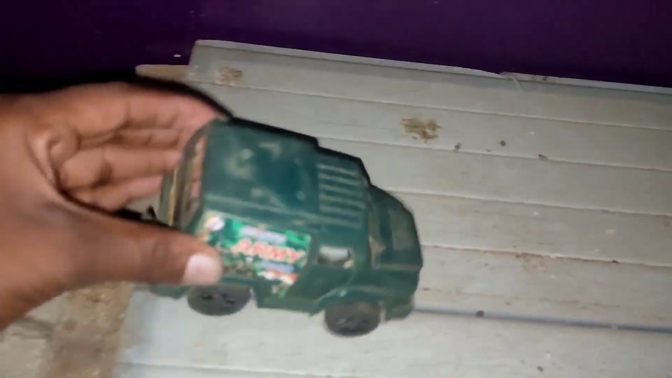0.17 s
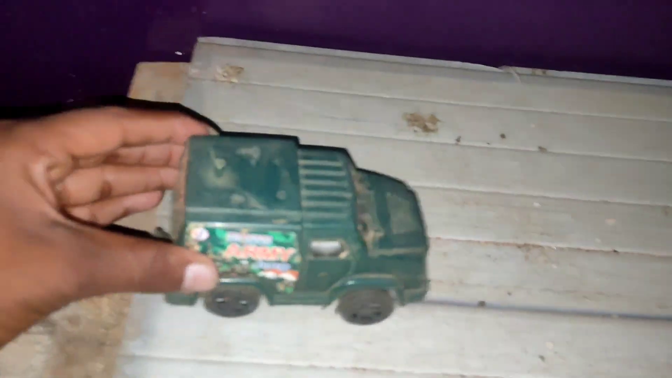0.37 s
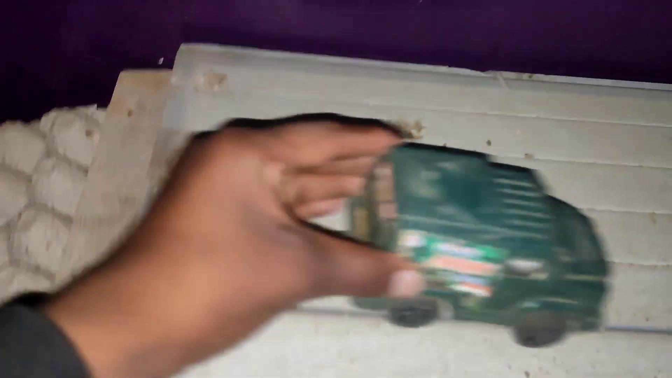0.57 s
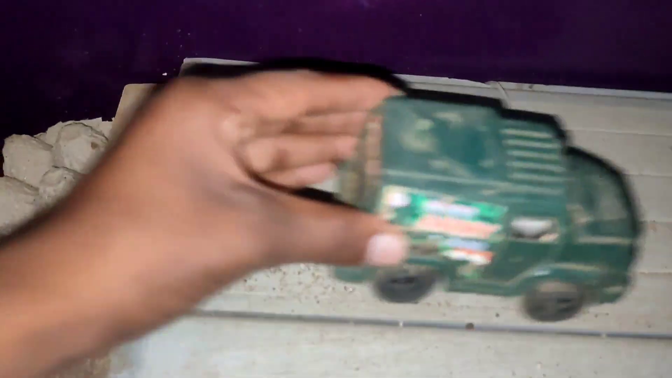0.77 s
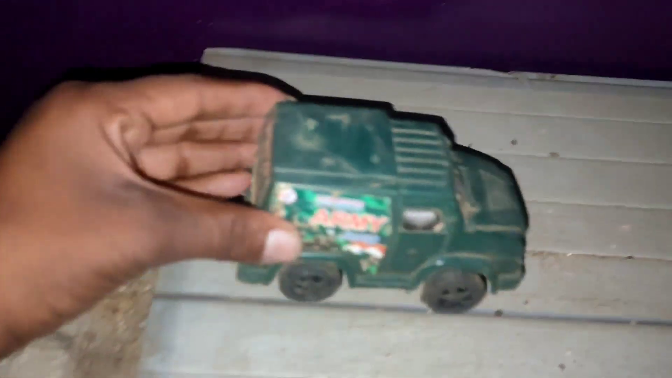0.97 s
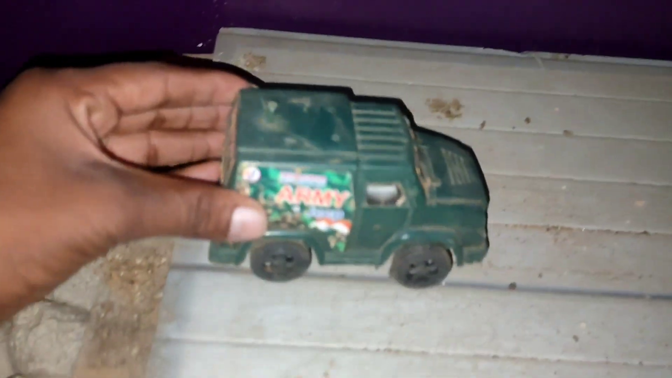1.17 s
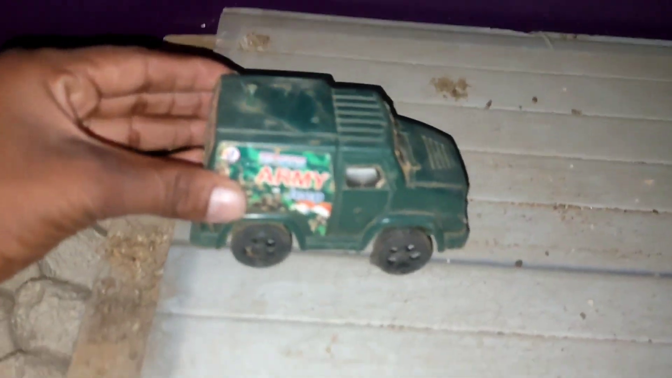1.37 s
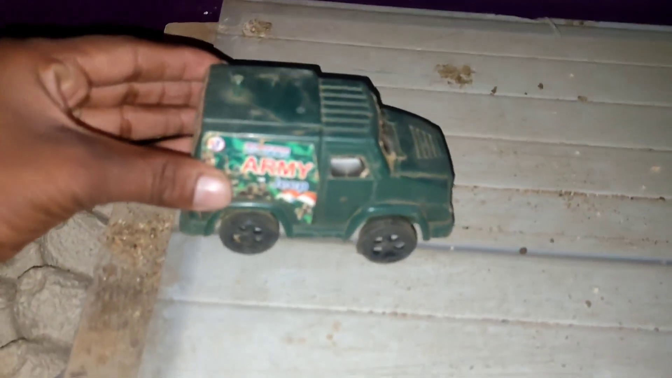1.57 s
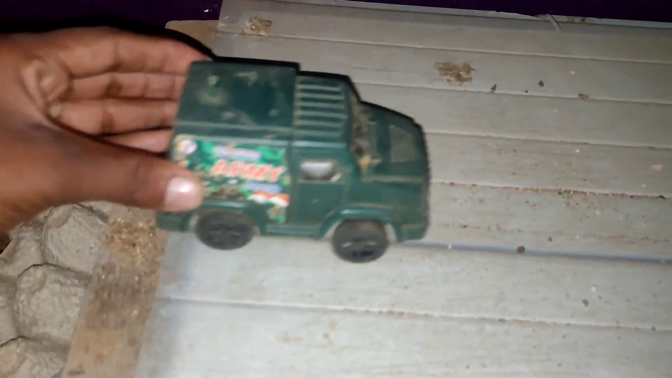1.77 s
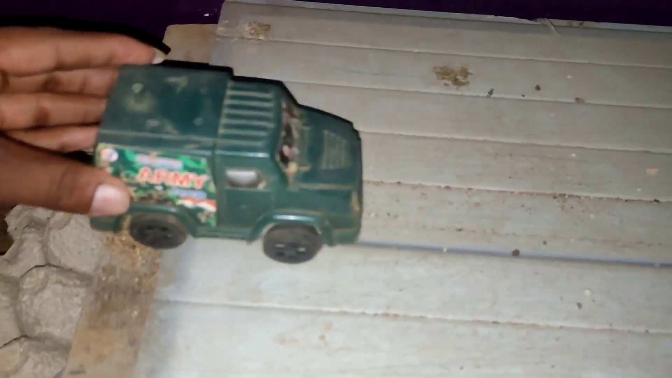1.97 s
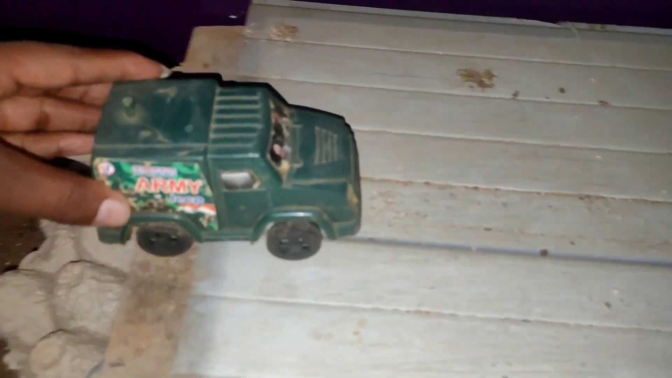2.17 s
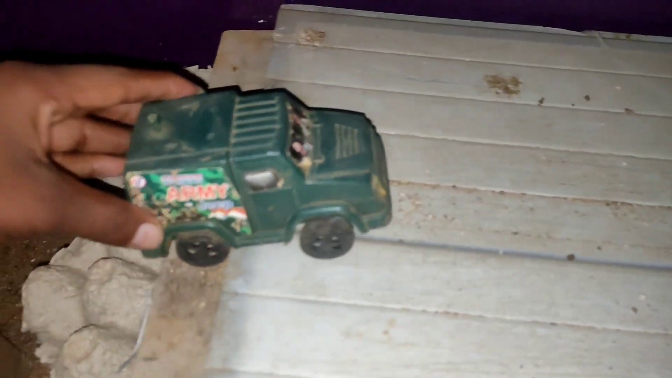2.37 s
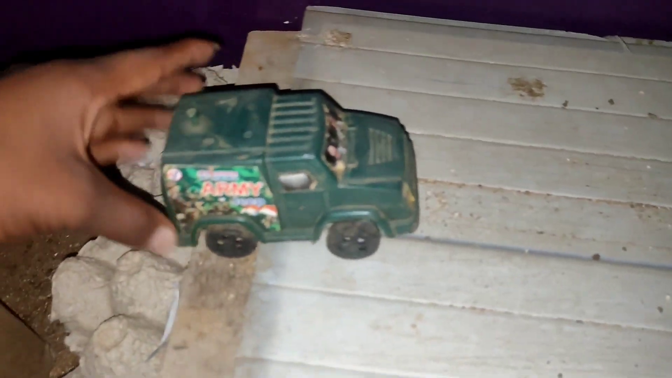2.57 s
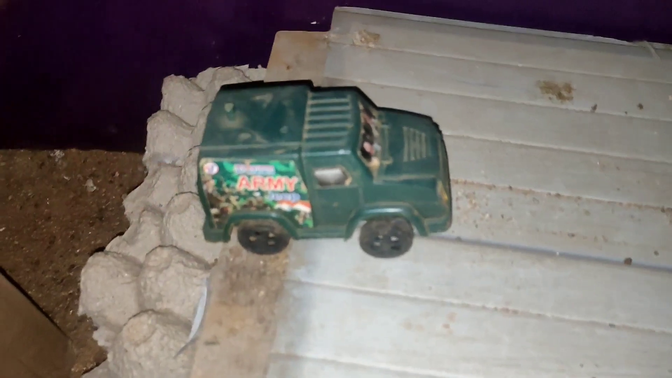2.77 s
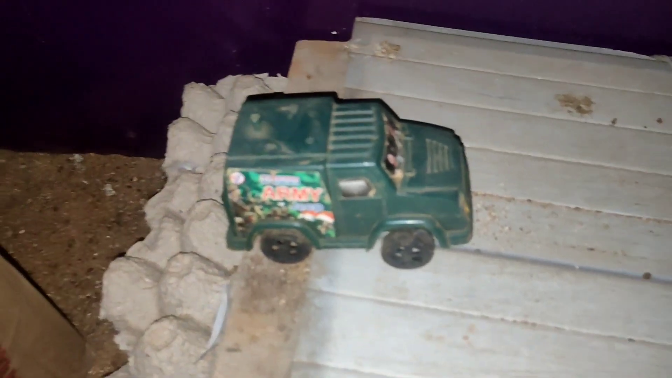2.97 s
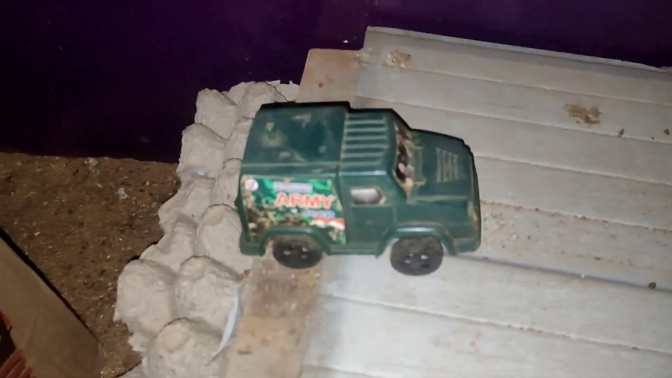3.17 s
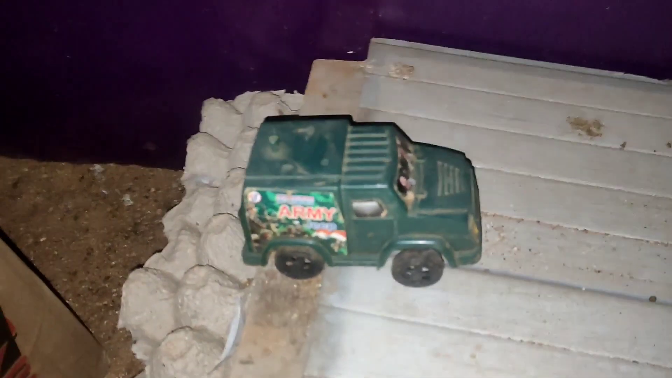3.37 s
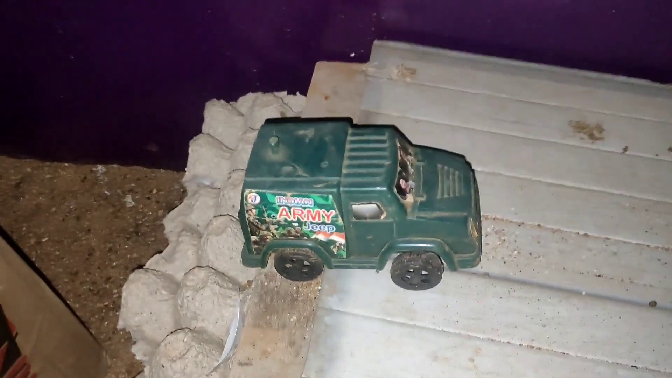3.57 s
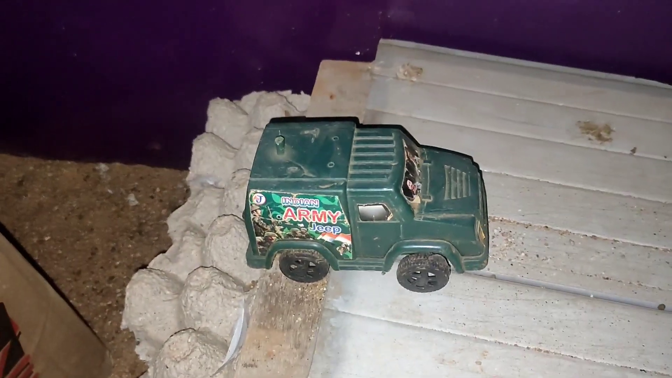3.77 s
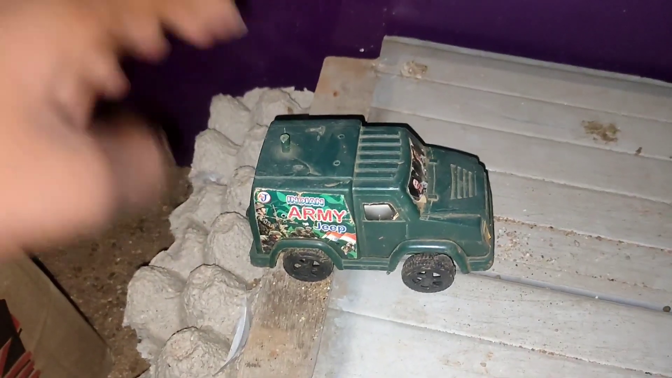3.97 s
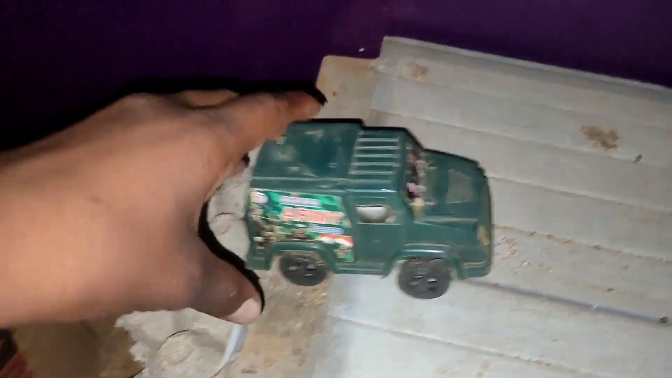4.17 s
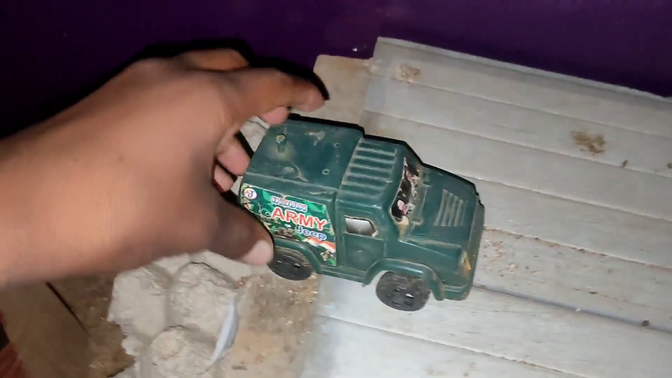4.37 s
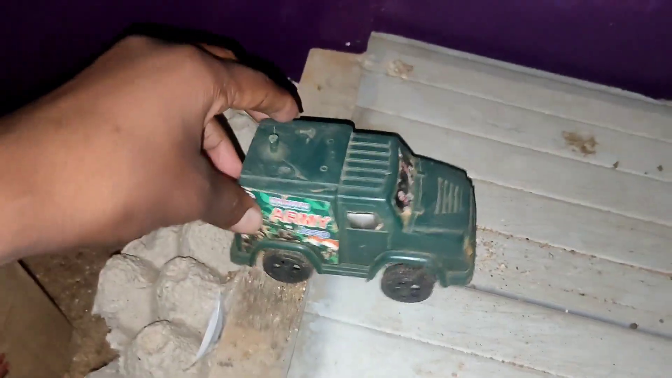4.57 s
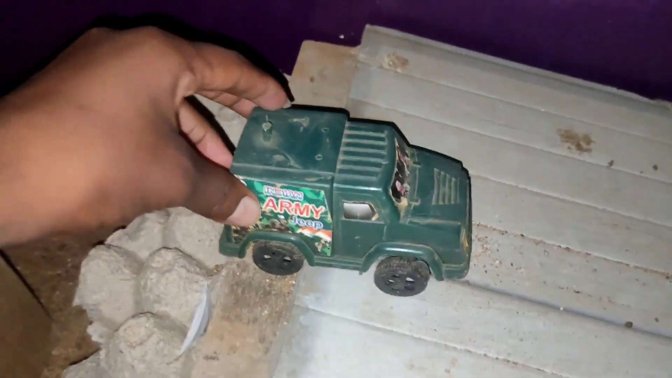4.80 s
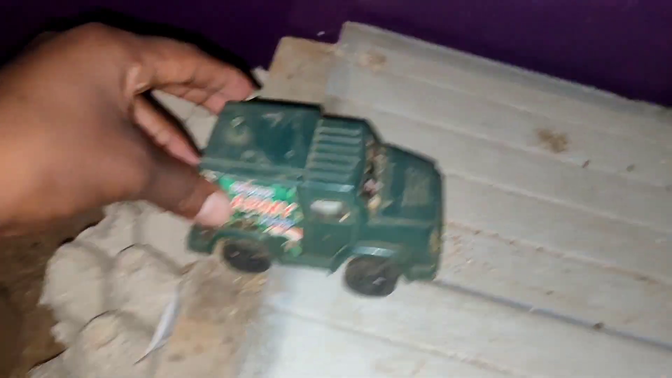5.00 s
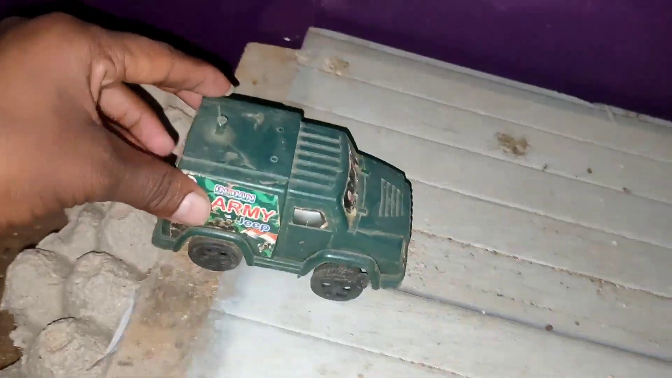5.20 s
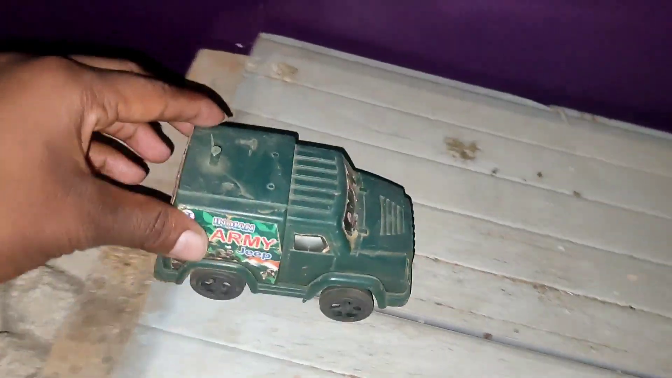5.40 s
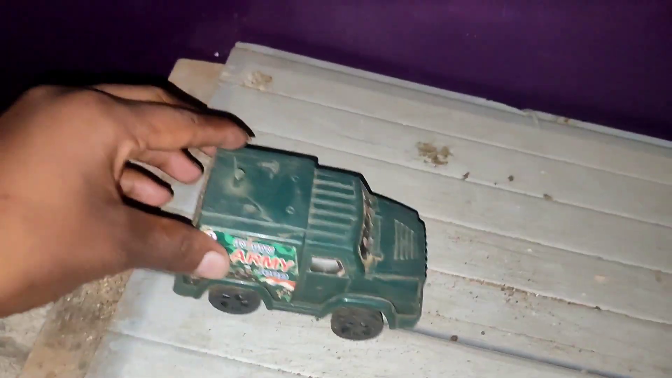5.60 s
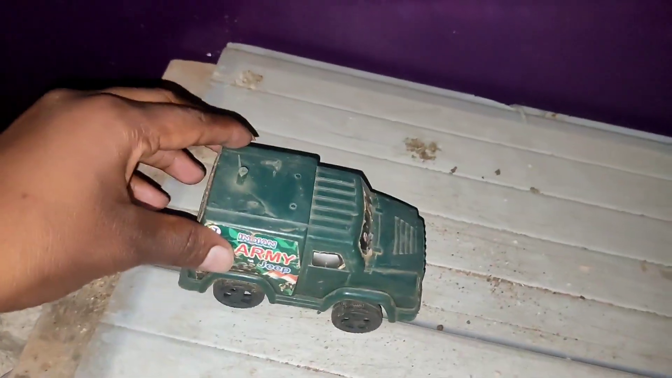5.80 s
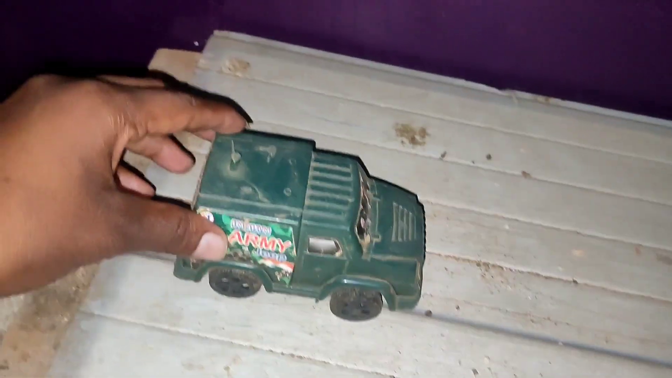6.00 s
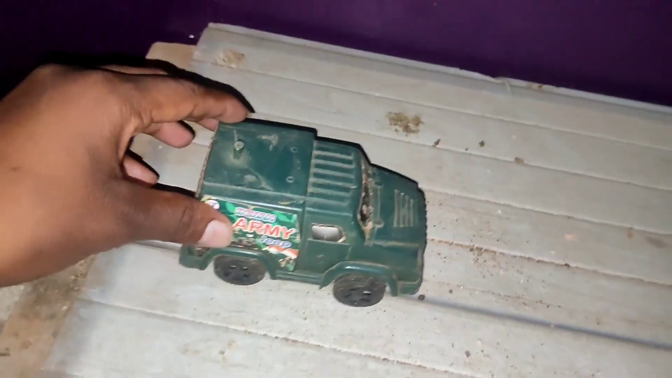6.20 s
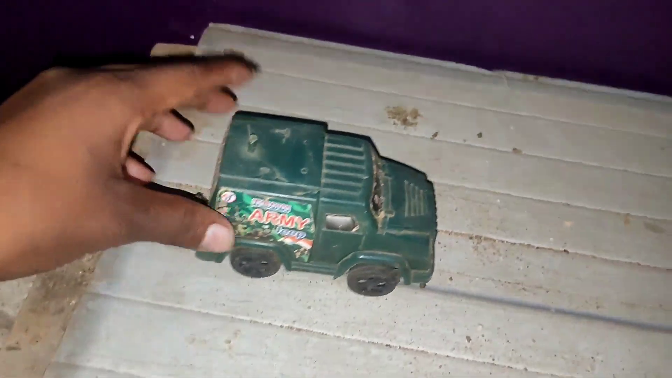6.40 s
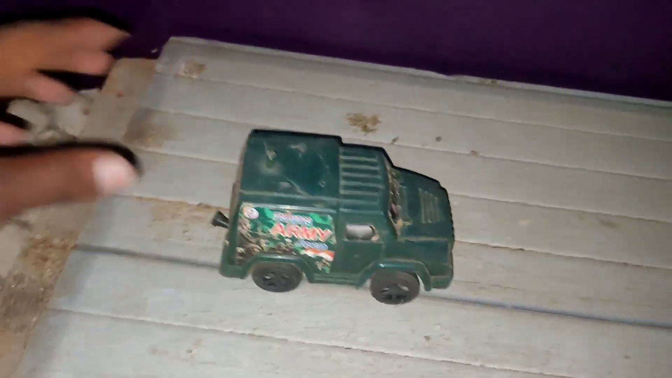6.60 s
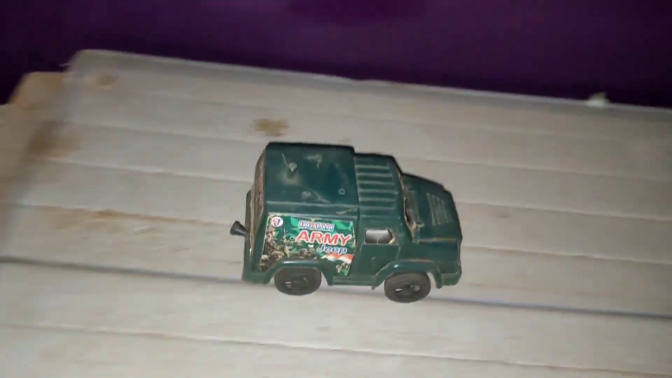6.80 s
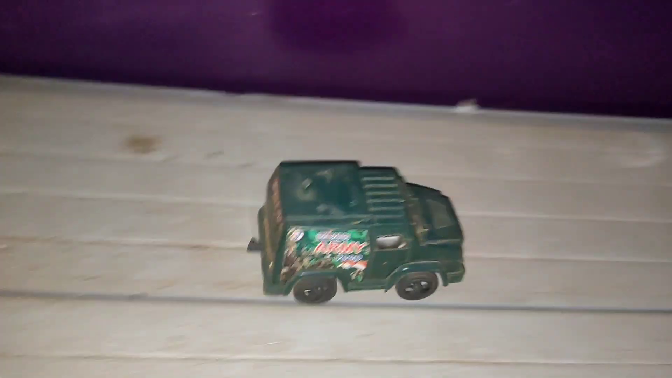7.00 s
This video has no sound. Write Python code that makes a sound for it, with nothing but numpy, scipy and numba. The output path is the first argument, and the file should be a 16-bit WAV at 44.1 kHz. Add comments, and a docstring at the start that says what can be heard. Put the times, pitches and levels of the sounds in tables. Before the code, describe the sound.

A small hollow plastic toy truck is pushed by hand over a wooden board indoors, its wheels rattling, knocking and briefly squeaking.

```python
"""Indoors, on a wooden board close to a phone, a hand pushes a small hollow plastic toy truck to and fro.
Tread and grit tap the shell and the board densely and make them ring; single knocks and snaps stand out.
Now and then an axle hisses and squeals, and once the wheels whirr. Skin and cloth rustle, rubs sing,
and the hand bumps and taps the phone. Low room hums and the board's lingering ring sound faintly."""
import sys
import numpy as np
from scipy import signal
from scipy.fft import rfft, irfft
from scipy.io import wavfile
from scipy.ndimage import uniform_filter1d
from numba import njit

SR = 44100
rng = np.random.default_rng(int(sys.argv[2]) if len(sys.argv) > 2 else 0)


def int16_out(signal):
    """Quantize to a 16-bit WAV file."""
    q = np.round(np.clip(np.atleast_2d(signal).T, -1, 1) * 32767)
    wavfile.write(sys.argv[1], SR, q.astype(np.int16))


N = 310905
TIME = np.arange(N) / SR
SIDES = np.array([[1], [-1]])  # plus on the left, minus on the right


def undb(db):
    """Turn decibels into a gain."""
    return np.exp(np.log(10) / 20 * np.asarray(db))

def level(x, db=0):
    """Set a signal's average (RMS) level."""
    return x * undb(db) / np.sqrt(np.mean(x ** 2))

def curve(rows, outside=-120.):
    """Join a table's points with straight lines, one value a sample."""
    times, *columns = np.transpose(rows)
    return [np.interp(TIME, times, c, left=outside, right=outside) for c in columns]

def band(x, lo_hz, hi_hz, order=2):
    """Keep the sound between two frequencies."""
    sos = signal.butter(order, [lo_hz, min(hi_hz, .45 * SR)], "bandpass", fs=SR, output="sos")
    return signal.sosfilt(sos, x)

def wobble(per_s):
    """A smooth random wander, roughly 1 either way."""
    hold = max(int(SR / per_s), 1)
    steps = np.repeat(rng.standard_normal(N // hold + 1), hold)
    return 1.3 * uniform_filter1d(uniform_filter1d(steps, hold), hold)[:N]

def strikes(times, db):
    """One clean, instant kick at each time."""
    x = np.zeros(N)
    x[(times * SR).astype(int)] = undb(db)
    return x

def bursts(times, db, fade_s):
    """One quickly fading puff of noise at each time."""
    x = np.zeros(N)
    fade = np.exp(-np.arange(int(.033 * SR)) / (fade_s * SR))
    puffs = rng.standard_normal((len(times), len(fade))) * fade
    for t, gain, puff in zip(times, undb(db), puffs):
        i = int(t * SR)
        x[i:i + len(puff)] += (gain * puff / np.sqrt(np.sum(puff ** 2)))[:N - i]
    return x

@njit
def resonate(x, hz, ring_s):
    """One ringing note whose pitch may move; it fades by 60 dB in ring_s."""
    turn = 2 * np.pi * hz / SR
    fade = np.exp(-np.log(1000) / (ring_s * SR))
    y, z = np.empty(len(x)), 0j
    for i in range(len(x)):
        z = z * fade * complex(np.cos(turn[i]), np.sin(turn[i])) + x[i] + 1e-18
        y[i] = z.imag
    return y

def ring(x, notes, ring_s, apart_db, drift=.04, share_db=2.5):
    """A struck part rings. Grip and contact point move, so each note's pitch and strength wander."""
    out = 0
    for k, (hz, db) in enumerate(notes):
        pitch = hz * (1 + drift * np.tanh(wobble(15)))
        share = undb(share_db * np.clip(wobble(40), -2, 1.5))
        note = resonate(x * share, pitch, ring_s)
        sign = (-1) ** (k // 2)
        out = out + sign * undb(db + apart_db * wobble(14) * SIDES) * note
    return out / np.sqrt(np.sum(undb(np.array(notes)[:, 1]) ** 2))

def tread_taps(per_s=900, spread_db=4., most_db=13.):
    """Tread and grit touch at chance moments: many small taps, a few large."""
    hits = (rng.random(N) < per_s / SR) * rng.choice([-1, 1], N)
    return level(hits * undb(np.minimum(spread_db * rng.exponential(size=N), most_db)))

# How loudly the truck rolls, one curve a push: t/s, level/dB
PUSHES = [
    [(0, -53), (.05, -69.5), (.12, -65), (.235, -78)],
    [(.24, -35.5), (.3, -47), (.35, -33.5), (.4, -49), (.48, -36), (.57, -21.5), (.63, -35.5), (.66, -38.5),
     (.73, -47.5), (.79, -52.5), (.9, -58.5), (1.0, -65.5), (1.2, -75), (1.54, -85)],
    [(1.545, -73.5), (1.56, -62), (1.75, -53), (1.9, -52.5), (2.03, -47.5), (2.12, -56), (2.17, -44.5),
     (2.23, -57), (2.37, -66.5)],
    [(2.378, -33), (2.385, -43.5), (2.45, -53.5), (2.51, -59), (2.54, -60), (2.64, -69), (2.86, -77),
     (3.1, -78.5), (3.4, -103)],
    [(4.27, -90), (4.287, -58), (4.335, -53.5), (4.41, -65), (4.435, -49), (4.47, -55.5)],
    [(4.475, -58), (4.575, -54.5), (4.6, -45.5), (4.67, -57.5), (4.72, -63), (4.78, -71.5), (4.92, -75),
     (4.95, -73)],
    [(4.96, -73.5), (5.1, -57.5), (5.27, -47.5), (5.36, -42.5), (5.47, -50), (5.51, -46), (5.56, -41),
     (5.63, -54.5), (5.7, -45.5), (5.8, -56.5)],
    [(5.81, -63), (5.87, -62.5), (5.94, -63), (5.97, -54), (6.06, -60), (6.13, -68.5), (6.24, -72.5),
     (6.3, -81)],
    [(6.31, -80.5), (6.44, -65), (6.49, -47.5), (6.53, -60), (6.63, -43.5), (6.7, -44), (6.8, -30),
     (6.92, -31), (7.05, -30)],
]
# Each push's balance against the shell at pivot_db: boom/dB, board/dB, grit/dB, fizz/dB
PUSH_BALANCE = [(-5, -1, -2.5, -6), (-3.5, -2.5, -7.5, -17), (-7, 2, -10, -17), (0.5, 0, -4, -16),
                (-8.5, -2.5, -12.5, -22), (-8.5, 3, 2.5, -8), (-8, 0.5, -6, -16.5), (-5, 1, -6.5, -11),
                (0.5, 1.5, -5, -20)]
def rolling(pivot_db=-50):
    """Gains of shell, boom, board, grit and fizz as the hand pushes; fast rolling feeds the shell most."""
    slopes = np.array([[1], [.86], [.79], [.86], [.72]])  # dB gained per dB of rolling
    gains = 0
    for push, balance in zip(PUSHES, PUSH_BALANCE):
        above_db = curve(push, outside=-300.)[0] - pivot_db
        balance_db = np.array([0, *balance])[:, None]
        gains = gains + undb(pivot_db + balance_db + slopes * above_db)
    return gains

def dust(contacts, grit_gain, fizz_gain):
    """Each contact sprays a moment of dust noise: a high fizz and a lower scrape of grit."""
    spray = level(signal.lfilter([1], [1, -np.exp(-1 / (.0053 * SR))], np.abs(contacts)))
    noise = spray * rng.standard_normal((2, N))
    dull = band(noise, 4700, 8500) * undb(1.5 * wobble(20))
    bright = band(spray * rng.standard_normal((2, N)), 8500, 18000)
    bright *= undb(np.array([[-4], [-9]]) + 1.5 * wobble(20))
    scrape = level(band(noise, 1400, 3300), -7)
    return level(dull + bright) * fizz_gain + scrape * grit_gain

# Ringing notes of the shell, the board's deep boom, the board and the grit: f/Hz, level/dB
SHELL_NOTES = [(590, -2), (715, -1.5), (800, 1.5), (885, 4), (995, 4.5), (1080, 3), (1150, 0), (1235, -5)]
BOOM_NOTES = [(95, -24), (127, -15), (180, -7), (199, 0)]
BOARD_NOTES = [(265, -1.5), (335, 0.5), (390, 0), (460, -6.5), (530, -3)]
GRIT_NOTES = [(1500, -5), (1860, 0), (2100, -2), (2370, -1), (2700, -5), (3000, -10), (3300, -11),
              (3700, -11)]
# How far each part's notes sway between left and right: part, level/dB
SWAY_DB = {"shell": 1.8, "boom": .2, "board": .7, "grit": 4}
def truck():
    """Rolling taps and single knocks set the same shell, board and small parts ringing."""
    shell_gain, boom_gain, board_gain, grit_gain, fizz_gain = rolling()
    shell_hits, boom_hits, board_hits, grit_hits, crack = knocks()
    contacts = tread_taps()

    def roll(gain, db):  # steady taps pile up, so they go in far weaker than a knock
        return gain * undb(db) * (contacts + 1.49 * tread_taps())

    shell = ring(roll(shell_gain, -25) + shell_hits, SHELL_NOTES, .028, SWAY_DB["shell"])
    boom = ring(roll(boom_gain, -30) + boom_hits, BOOM_NOTES, .12, SWAY_DB["boom"],
                drift=.012, share_db=1)
    board = ring(roll(board_gain, -28) + board_hits, BOARD_NOTES, .045, SWAY_DB["board"])
    grit = ring(roll(grit_gain, -23) + grit_hits, GRIT_NOTES, .008, SWAY_DB["grit"])
    ringing = band(shell + boom + board + grit * undb(2 * SIDES), 95, 18000)
    return ringing + crack + dust(contacts, grit_gain, fizz_gain)

# The hand moving the phone: t/s, sway level/dB, thump level/dB
HANDLING = [(0, -70, -70.5), (.57, -66, -54), (.9, -66.5, -70.5), (1.7, -67, -74.5), (2.0, -83, -63),
            (2.95, -63, -71.5), (3.5, -72.5, -84.5), (4.2, -76.5, -85.5), (4.5, -74.5, -70),
            (5.5, -76, -65.5), (6.3, -75.5, -66), (7.05, -77, -72.5)]
def hand_rumble():
    """The hand sways the phone, too low to hear, and thumps it softly."""
    sway_db, thump_db = curve(HANDLING)
    slow = band(rng.standard_normal(N), 3, 20, order=1)
    sway = level(band(slow, 3, 35, order=1)) * undb(sway_db + 5.5 * wobble(6))
    thump = level(band(rng.standard_normal(N), 32, 115)) * undb(thump_db + 5 * wobble(12))
    return sway + thump

# Tone of the room's hiss: f/Hz, relative level/dB
AIR_TONE = [(80, -21), (140, -8.5), (240, -3.5), (330, -15), (1000, -16.5), (4000, -21), (15500, -28)]
# Faint held tones, low room hums and the board's lingering ring: start t/s, end t/s, f/Hz, level/dB
HELD_TONES = [(.85, 1.85, 56, -64.5), (3.45, 4.15, 105, -83), (-.2, .28, 430, -70), (.82, 1.35, 385, -71),
              (.82, 1.2, 555, -73)]
def air_and_tones(hiss_db=-80):
    """The room hisses faintly; low room hums and the board's lingering ring waver, come and go."""
    tone_hz, tone_db = np.transpose(AIR_TONE)
    tone = undb(np.interp(np.log(np.fft.rfftfreq(N, 1 / SR) + 1), np.log(tone_hz), tone_db))
    middle, side = (level(irfft(rfft(rng.standard_normal(N)) * tone, N), hiss_db) for _ in range(2))
    out = (middle + .2 * side * SIDES) * undb(1.5 * wobble(3))
    for start, end, hz, db in HELD_TONES:
        fade = np.clip(np.minimum(TIME - start, end - TIME) / .14, 0, 1)
        phase = 2 * np.pi * np.cumsum(hz * (1 + .015 * wobble(9))) / SR
        out = out + np.sqrt(2) * undb(db + 1.5 * wobble(20)) * fade * np.sin(phase)
    return out

# Knocks of wheels and axles: t/s, level/dB, crack above that level/dB, thud above that level/dB
KNOCKS = [(0.242, -20.5, -0.5, -24), (0.283, -41, 16.5, -21), (0.323, -27.5, -28, -18),
          (0.346, -32, -22, -30), (0.362, -36, 16.5, -10), (0.462, -30, 11, -5), (0.515, -21.5, -18, -16),
          (0.539, -19.5, -26, -18), (0.555, -17.5, -13, -20), (0.571, -16.5, 0.5, -8),
          (0.617, -16.5, -28, -13.5), (0.627, -16, -20, -10.5), (0.675, -28.5, -21, -9.5),
          (0.725, -31, -26, -23), (0.751, -29.5, -24, -33), (0.766, -36, -13, -25),
          (0.812, -36.5, -28, -28), (0.831, -34.5, -27, -30), (0.848, -38.5, -28, -18),
          (0.887, -37.5, -11, -31), (0.902, -38, -12, -21), (0.925, -43, -22, -13),
          (1.555, -46.5, -32, -12.5), (1.662, -36.5, -26, -27), (1.708, -47.5, 16, -0.5),
          (1.769, -36, -3.5, -10.5), (1.864, -60.5, 35.5, -20), (1.871, -31.5, -29, -32),
          (1.884, -49, 26.5, -10), (1.916, -29.5, -14, -35), (1.976, -39, -24, -21),
          (2.006, -27, -4.5, -7.5), (2.016, -34.5, -18, -3), (2.165, -32, -9, -19),
          (2.18, -35.5, -20, -4.5), (2.379, -33, -3, -24), (2.383, -23.5, -8.5, -13),
          (2.411, -28, -9.5, -18), (2.448, -44.5, -20, 4), (2.524, -42, -20, -10), (2.535, -37.5, -25, -8),
          (2.578, -43.5, -27, -6.5), (4.285, -50.5, -14, -19), (4.324, -39.5, -5.5, -21),
          (4.423, -42.5, -9, -9), (4.43, -42.5, -13, -3), (4.465, -63, 26, -13), (4.479, -49, 20, -10),
          (4.534, -41.5, 12, -19), (4.582, -38, 17, -23), (4.589, -31, 11, -41), (4.64, -30.5, -7, -13),
          (4.671, -32.5, -24, -5.5), (4.919, -45.5, -12, -14), (5.236, -38, -2, -11),
          (5.31, -28.5, 0.5, -13), (5.351, -24.5, -25, -9.5), (5.379, -27, -35, -11.5),
          (5.418, -23.5, -27, -21), (5.426, -26.5, -34, -30), (5.46, -24.5, -13, -37),
          (5.468, -24, -19, -27), (5.514, -28.5, -17, -12), (5.547, -26.5, -12, -14),
          (5.56, -20, -9.5, -20), (5.598, -32.5, -30, -11), (5.644, -25.5, -10, -22),
          (5.699, -31, -5.5, -5), (5.849, -47, -20, -10), (5.886, -44, -10, -22),
          (5.956, -43.5, -4.5, -2.5), (5.98, -43, -6, -25), (6.054, -44, -29, -12), (6.232, -52, -23, -7),
          (6.374, -51.5, -11, -7.5), (6.44, -44.5, -9, -9), (6.463, -51, 13, 4), (6.49, -47.5, 11, 6),
          (6.627, -28.5, -10, -5.5), (6.661, -29, -3.5, -21), (6.697, -22, -14, -17), (6.71, -20, -10, -24),
          (6.738, -24.5, -14, -11), (6.752, -28, -15, -29), (6.794, -26, -11, -18), (6.831, -28, 12, -10),
          (6.878, -24, -6, -2), (6.922, -16, -6.5, -29), (6.938, -17, -2.5, -7.5), (6.959, -25, -3, -12),
          (6.98, -24, -16, -29), (7.003, -19, -6, -6), (7.012, -24, -18, -16), (7.037, -16.5, -1.5, -15)]
def knocks():
    """Each knock kicks shell, boom, board and grit, and gives a sharp crack."""
    times, db, crack_db, thud_db = np.transpose(KNOCKS)

    def hit(hit_db):  # a first contact, then loose parts chatter
        return strikes(times, hit_db - 1.5) + bursts(times, hit_db + 1.5, fade_s=.0055)

    shell = hit(db - 2)
    boom = strikes(times, db + thud_db - 7)
    board = hit(db + thud_db)
    grit = hit(db + np.minimum(crack_db, 4) - 4.5)
    snaps = np.array([bursts(times, db + crack_db - 2, fade_s=.002) for _ in range(2)])
    crack = band(snaps, 2500, 14000, order=1) * undb(1.5 * SIDES)
    return shell, boom, board, grit, crack

# Rubs that sing: start t/s, end t/s, f/Hz, level/dB
RUBS = [(0.77, 0.77, 3440, -66), (0.88, 0.957, 11000, -74), (1.024, 1.046, 3380, -74),
        (1.161, 1.237, 10800, -78), (1.22, 1.24, 3580, -74), (1.31, 1.31, 3550, -73),
        (1.425, 1.486, 11000, -71), (1.479, 1.502, 3370, -73)]
def rubs(width=.057, edge_s=.019):
    """Each rub is grainy noise squeezed into a narrow band around one pitch."""
    out = 0
    grainy = rng.standard_normal(N) * undb(3 * wobble(120))
    for start, end, hz, db in RUBS:
        fade = np.clip(np.minimum(TIME - start, end - TIME) / edge_s + 1, 0, 1) ** 2
        out = out + fade * level(band(grainy, hz * (1 - width), hz * (1 + width), order=1), db)
    return out

# Rustles: full from t/s, full until t/s, level/dB, top band above that level/dB
RUSTLES = [(.914, 0.967, -76, 1), (1.028, 1.054, -76, 1.5), (1.231, 1.22, -66.5, 3),
           (1.31, 1.309, -70.5, 1.5), (1.493, 1.5, -68.5, -1), (2.68, 2.83, -80.5, -0.5),
           (2.787, 2.93, -80.5, 0), (3.128, 3.376, -73.5, 4), (3.93, 3.96, -79.5, 9), (4.015, 4.05, -78, 9),
           (6.83, 6.92, -56, 0)]
def rustle(rise_db_per_s=397, fall_db_per_s=750):
    """Skin and cloth make a high, grainy hiss that swells, holds and stops."""
    out = lower_gain = top_gain = 0
    for start, end, db, top_db in RUSTLES:
        before, after = np.maximum(start - TIME, 0), np.maximum(TIME - end, 0)
        swell = undb(db - rise_db_per_s * before - fall_db_per_s * after)
        lower_gain = lower_gain + swell
        top_gain = top_gain + swell * undb(top_db)
    for lo_hz, hi_hz, gain in ((3900, 9000, lower_gain), (9000, 17000, top_gain * undb(SIDES))):
        grain = undb(3 * wobble(150) + 1.5 * wobble(25))
        middle, side = (level(band(rng.standard_normal(N), lo_hz, hi_hz, order=3)) for _ in range(2))
        out = out + gain * grain * (middle + .023 * side * SIDES)
    return out

# Soft finger taps on the phone: t/s, peak level/dB
FINGER_TAPS = [(2.934, -54), (2.964, -50.5), (2.999, -56.5), (4.211, -56)]
def finger_taps(hz=128, fade_s=.0051):
    """Each tap is one dull swing that dies quickly."""
    t = TIME[:int(.03 * SR)]
    swing = -np.exp(-t / fade_s) * np.sin(2 * np.pi * hz * t)
    return signal.fftconvolve(strikes(*np.transpose(FINGER_TAPS)), swing / np.max(np.abs(swing)))[:N]

# Dry ticks: t/s, relative level/dB, thud offset/dB
DRY_TICKS = [(3.036, -65.5, 2), (3.053, -55, -16), (3.0708, -52, -6), (3.1053, -55, -5.5),
             (3.109, -60, -13), (3.1398, -50.5, -8), (3.1626, -52, 5), (3.178, -55, -18), (3.2, -65, -24.5),
             (3.23, -58.5, -25.5), (3.4516, -48.5, -15), (3.5276, -41.5, -6.5), (3.8035, -57.5, -30.5),
             (3.8361, -61, -24), (4.3226, -44.5, -11), (4.534, -43, -30), (4.589, -40, -30),
             (5.53, -45, -30), (5.535, -39, -30), (5.703, -46, -32), (6.491, -45.5, -30), (6.672, -43, -30)]
def dry_ticks():
    """Fingers click, and later the truck's knocks and grit snap: each a bright snap over a short thud."""
    times, db, thud_db = np.transpose(DRY_TICKS)
    t = TIME[:int(.02 * SR)]
    thud = np.exp(-t / .00071) * np.sin(2 * np.pi * 300 * t)
    snaps = band(bursts(times, db + 17, fade_s=.00056), 2000, 6000, order=1)
    return snaps + signal.fftconvolve(strikes(times, db + thud_db + 14.5), thud)[:N]

# The axle's hiss: t/s, level/dB
AXLE_HISS = [(4.98, -85), (5.16, -71), (5.3, -64.5), (5.4, -72), (5.53, -60.5), (5.6, -91), (5.82, -80)]
def axle_hiss():
    """The axle gives a smooth, high hiss, stronger on the left."""
    hiss = level(band(rng.standard_normal((2, N)), 8500, 17000))
    return hiss * undb(curve(AXLE_HISS)[0] + 1.5 * wobble(30) + np.array([[4.5], [.5]]))

# The axle's squeals, one curve a tone: t/s, f/Hz, level/dB
SQUEALS = [
    [(4.99, 9600, -82), (5.02, 11400, -77), (5.055, 12750, -75), (5.105, 13600, -75), (5.14, 14750, -73),
     (5.165, 15100, -73), (5.19, 14950, -71), (5.225, 15450, -71), (5.265, 15500, -70), (5.31, 14000, -66),
     (5.36, 10900, -76)],
    [(5.045, 10900, -82), (5.11, 11700, -78), (5.14, 12400, -74), (5.205, 12600, -76)],
    [(5.14, 11700, -78), (5.2, 11700, -77), (5.245, 12300, -74), (5.28, 12000, -79)],
    [(5.945, 12000, -84), (5.97, 13000, -80), (5.995, 13300, -77), (6.02, 11200, -80)],
]
def axle_squeal():
    """Thin, slightly shaky tones glide with the speed of the wheels."""
    out = 0
    for squeal in SQUEALS:
        hz, db = curve(squeal)
        phase = 2 * np.pi * np.cumsum(hz + 25 * wobble(200)) / SR
        out = out + np.sqrt(2) * undb(db + 2 * wobble(60)) * np.sin(phase)
    return out

# The wheels' rough whirr during one push: t/s, f/Hz, level/dB
WHIRR = [(5.0, 2380, -80), (5.15, 2400, -65), (5.3, 2470, -61), (5.37, 2700, -55), (5.43, 2300, -54),
         (5.48, 2250, -72)]
def wheel_whirr(ring_s=.011):
    """Dense taps ring one gliding note; left and right each get their own taps."""
    times, hz, _ = np.transpose(WHIRR)
    pitch = np.interp(TIME, times, hz)
    ringing = np.array([level(resonate(tread_taps(), pitch, ring_s)) for _ in range(2)])
    return ringing * undb(curve(WHIRR)[1])

def room_echo(x, ring_s=.22):
    """The room adds a short fading tail, with the same bass on both sides."""
    t = TIME[:int(.6 * SR)]
    fade = np.exp(-np.log(1000) * t / ring_s) * (t > .003)
    shared, left, right = rng.standard_normal((3, len(t))) * fade
    tails = [band(shared, 72, 480) + band(own, 450, 6000, order=1) for own in (left, right)]
    return np.array([signal.fftconvolve(side, tail / np.sqrt(np.sum(tail ** 2)))[:N]
                     for side, tail in zip(x, tails)])

def late_on_left(x, lag_samples=8):
    """The shell's range of pitches reaches the left side a little late."""
    left, right = x
    body = signal.sosfiltfilt(signal.butter(1, (300, 1500), "bandpass", fs=SR, output="sos"), left)
    return np.array([left - body + np.roll(body, lag_samples), right])

def scene():
    """Mix the toy, its echo, the hand and the room in stereo."""
    toy = truck() + wheel_whirr()
    axle = axle_hiss() + axle_squeal()
    touches = hand_rumble() + rustle() + finger_taps() + dry_ticks()
    return late_on_left(toy) + undb(-12) * room_echo(toy) + axle + rubs() + touches + air_and_tones()

def record(dry, top_hz=15600):
    """The phone cuts off the highest treble."""
    return signal.sosfilt(signal.ellip(10, .2, 70, top_hz, fs=SR, output="sos"), dry)


dry = scene()
out = record(dry)
int16_out(out)
```